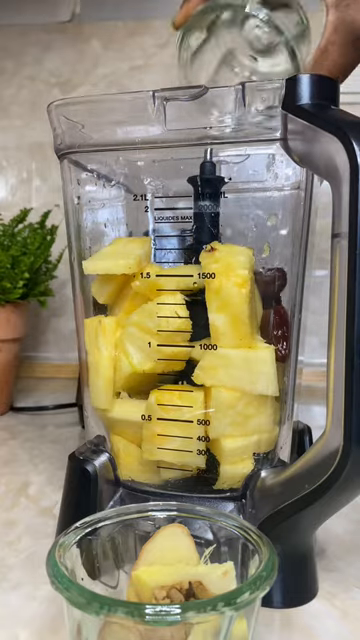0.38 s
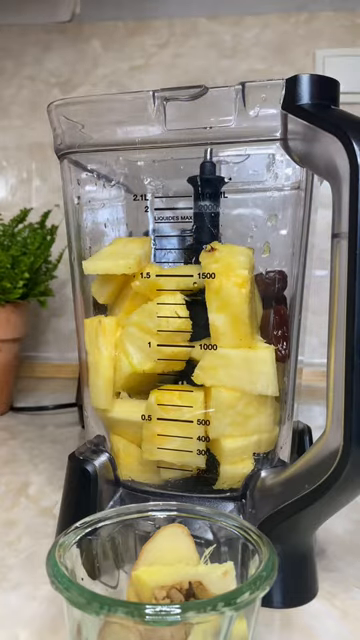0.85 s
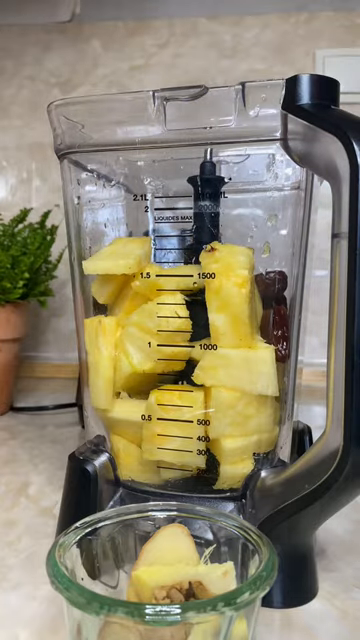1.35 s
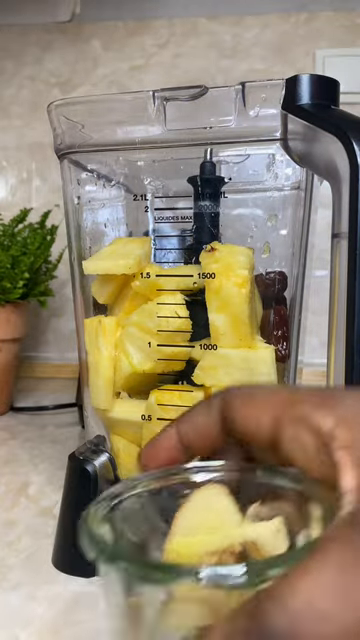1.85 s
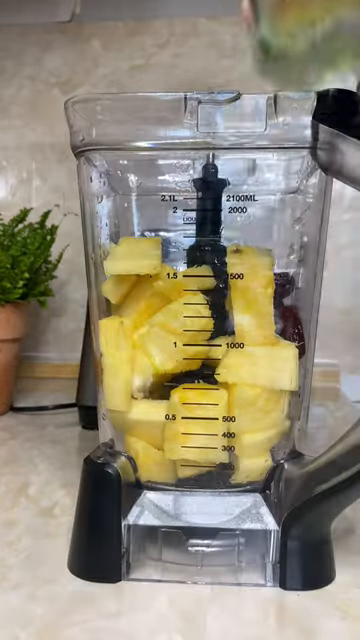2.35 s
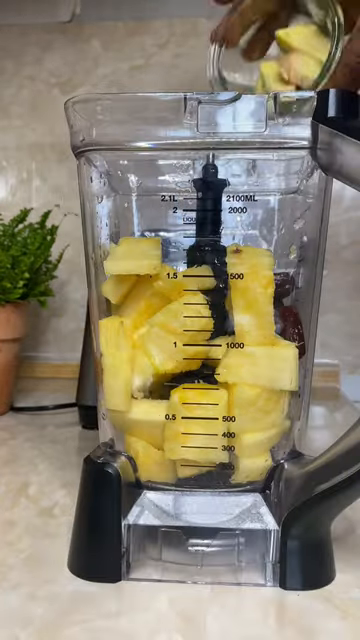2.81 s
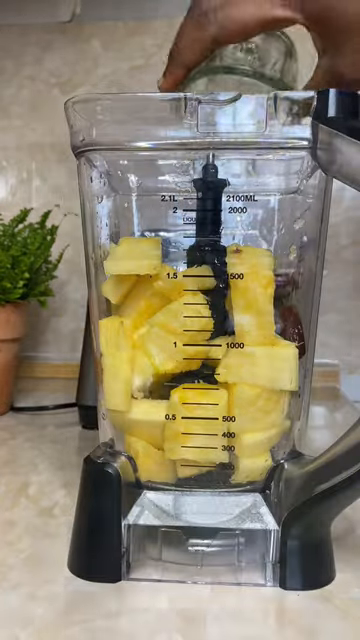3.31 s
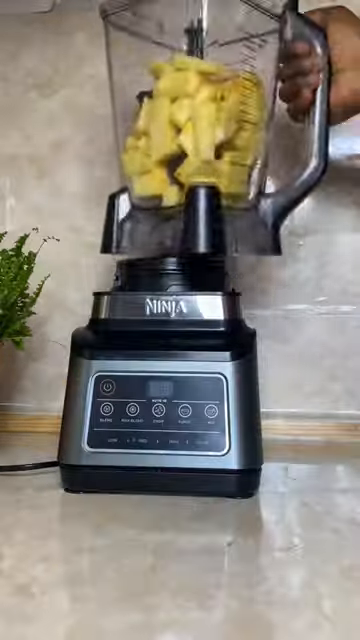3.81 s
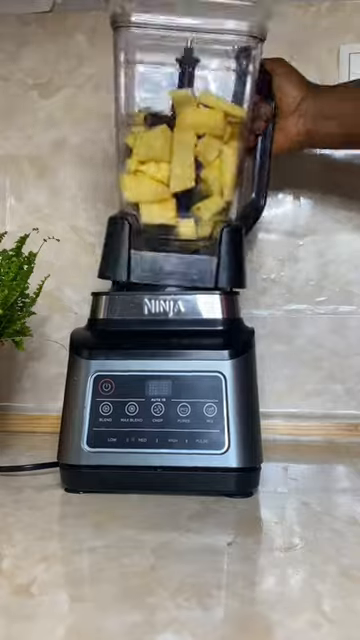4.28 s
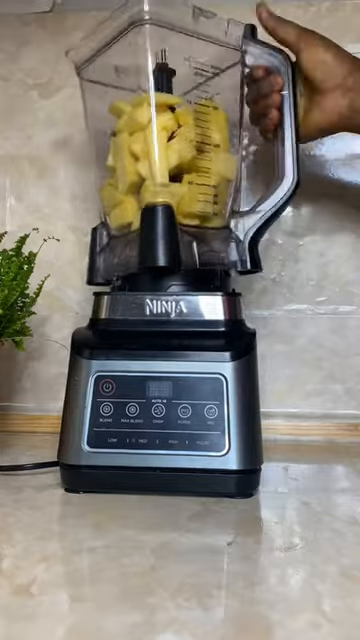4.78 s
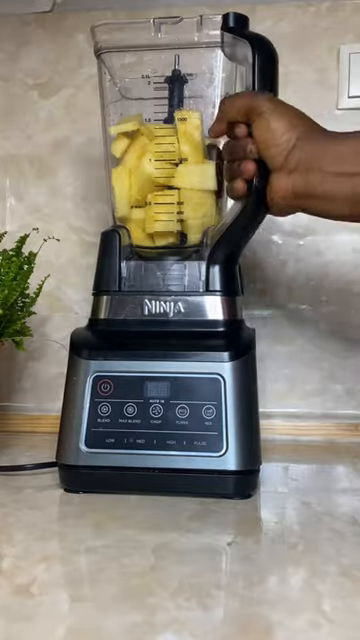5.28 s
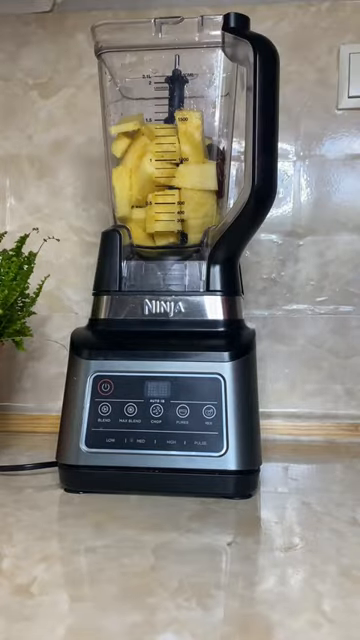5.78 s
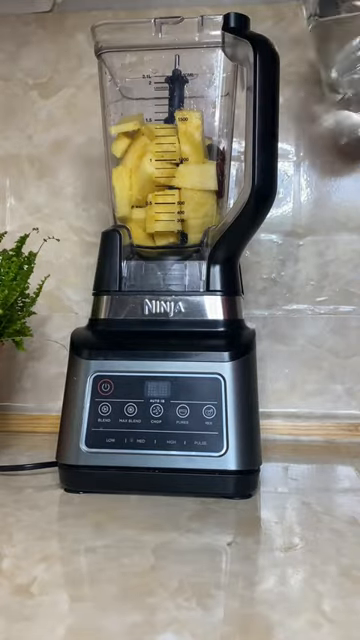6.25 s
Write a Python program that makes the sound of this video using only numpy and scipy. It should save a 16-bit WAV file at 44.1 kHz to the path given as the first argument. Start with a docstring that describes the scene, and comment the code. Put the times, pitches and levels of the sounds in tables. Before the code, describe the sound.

Close-up kitchen handling: dried fruit and root pieces tumble into a hollow plastic jar, which is then rattled and locked onto a blender base.

```python
"""Dried fruit and root chunks are tipped from glass bowls into a plastic blender jar in a tiled kitchen.
A hand lifts the second bowl from the counter; then the jar is set on its base, knocking and scraping home.
Every blow is a cluster of contacts ringing a body's modes, plus unpitched rattle; rubbing is grainy noise.
Sticky ticks, whispers, a short echo and dull air with low rumble and appliance tones surround the blows.
Two close microphone ports hear it all; the sound drops out completely for a moment midway."""
import sys
import numpy as np
from scipy import signal
from scipy.fft import rfft, irfft, next_fast_len
from scipy.io import wavfile
from scipy.ndimage import uniform_filter1d

SR = 44100
rng = np.random.default_rng(int(sys.argv[2]) if len(sys.argv) > 2 else 0)


def log_audio(samples):
    """Write samples as a 16-bit WAV file to the path given in sys.argv[1]."""
    # one column per channel
    frames = np.atleast_2d(samples).T
    # limit to full scale, then quantise
    limited = np.clip(frames, -1, 1)
    pcm = np.round(limited * 32767).astype(np.int16)
    wavfile.write(sys.argv[1], SR, pcm)


def ratio(d):
    """dB to gain"""
    e = np.asarray(d, float) / 20
    return 10 ** e


N = 281358

# Blows, levels as heard ahead of the microphone:
# full contact t/s, knock peak level/dB, thud level/dB re knock, clack level/dB re knock, contact time/s
CHUNK_DROPS = [(0.083, -44, 13.5, -1.5, 0.002), (0.097, -43.5, 16.5, -1, 0.00063),
               (0.108, -42.5, 11.5, -8, 0.00078), (0.143, -33, 4, -18, 0.003),
               (0.1505, -14, -20.5, -11, 0.0012), (0.1695, -10, -24.5, -14.5, 0.0015),
               (0.188, -16, -5.5, -15, 0.0016), (0.221, -20.5, -6, -14.5, 0.0014),
               (0.233, -28.5, -2, -4.5, 0.0013), (0.243, -36, 12.5, -11, 0.0021),
               (0.256, -29.5, -3.5, -34, 0.0014), (0.289, -39, 8.5, -4.5, 0.0016),
               (0.3, -34.5, 13.5, -13, 0.0014), (0.34, -42, 11.5, -6.5, 0.0017),
               (0.37, -35, 0.5, -15.5, 0.0013), (0.406, -42.5, 1.5, -17, 0.0012),
               (0.466, -37, -5.5, -5, 0.0011), (0.498, -50.5, 6, -8, 0.00087),
               (0.54, -59.5, 9.5, -23, 0.0015), (3.119, -29.5, -2.5, -31.5, 0.00057),
               (3.139, -43, 14.5, -8, 0.0013), (3.16, -39.5, 11, -15, 0.0015),
               (3.182, -27.5, -14, -37, 0.0016), (3.201, -27.5, -3, -37, 0.0021),
               (3.2135, -21.5, -14.5, -38, 0.0011), (3.228, -26.5, -8, -24, 0.0021),
               (3.236, -22, -1, -39, 0.0024), (3.247, -27, 3.5, -41, 0.0018),
               (3.266, -30.5, -8, -48, 0.0016), (3.314, -49, -10, -39, 0.0024),
               (3.322, -41, 3.5, -8.5, 0.0018)]  # chunks landing in the jar
BASE_SEATING = [(3.484, -24, 2, -16.5, 0.0019), (4.013, -12.5, -6, -14, 0.002),
                (4.067, -19, -5.5, -14.5, 0.0023), (4.096, -30.5, 2.5, -13.5, 0.0029),
                (4.113, -12.5, -5, -15.5, 0.0024), (4.141, -20.5, 0, -4.5, 0.0025),
                (4.168, -43, 8.5, -22.5, 0.0032), (4.241, -40, 5, -3, 0.0041),
                (4.254, -27.5, 1, -7.5, 0.0022), (4.291, -28, 2.5, -2.5, 0.003),
                (4.298, -18, -4, -6.5, 0.002), (4.308, -16.5, -3.5, -5, 0.0035),
                (4.322, -17.5, -7.5, -29, 0.002), (4.347, -31, -10, -8.5, 0.0017),
                (4.361, -35.5, 5.5, -0.5, 0.0022), (4.404, -22.5, -3, -10, 0.002),
                (4.412, -21.5, 2, -11.5, 0.0022), (4.431, -20.5, 2, -8.5, 0.0025),
                (4.469, -35, -2.5, -8, 0.0022), (4.5, -24.5, -7.5, -34, 0.002), (4.543, -46, 7, -10, 0.002),
                (4.639, -34.5, -2, -4, 0.0025), (4.666, -28.5, 0, -21.5, 0.0022),
                (4.682, -27, -1.5, -7.5, 0.003), (4.695, -19.5, -1, -9.5, 0.0024),
                (4.703, -30, 10.5, -16, 0.002), (4.723, -30.5, 6, -1.5, 0.0024),
                (4.737, -45.5, -4, -24, 0.0022), (4.78, -43, -1.5, -9.5, 0.0022),
                (4.825, -38.5, 9.5, 0.5, 0.0032), (4.857, -24, -6, -2.5, 0.0035),
                (4.863, -18, 1.5, -1, 0.0024), (4.875, -10.5, -12.5, -0.5, 0.0016),
                (4.885, -19, -5.5, -16.5, 0.0033), (4.901, -16, -6, -5, 0.0022),
                (4.926, -32.5, 1, -12.5, 0.0027), (4.951, -34.5, -0.5, -4.5, 0.0025),
                (4.999, -47.5, 6, -9.5, 0.0017), (5.041, -52, 4, -25, 0.0018),
                (5.071, -45.5, 5, -20, 0.0019), (5.12, -32, -3, -6, 0.0022), (5.132, -23, -12, -6, 0.0022),
                (5.139, -29, -9, -9.5, 0.0019), (5.225, -53, 7, 4, 0.0022), (5.264, -34.5, -4, 7, 0.0044),
                (5.276, -16.5, -5.5, -1, 0.0027), (5.29, -31.5, -3.5, -10.5, 0.0019),
                (5.395, -45, -10.5, -6, 0.0032), (5.417, -52.5, 4, -10, 0.0026)]  # the jar's foot against the base
BASE_TOUCHES = [(3.864, -53.5, -5, 5, 0.003), (3.875, -36, -4, 3, 0.003), (3.883, -21.5, -9, -6.5, 0.0012),
                (3.901, -33.5, 2.5, -10, 0.002), (3.956, -28, -5, -1.5, 0.0011)]  # the jar's foot, still hanging, brushes the base and rings freely
BOWL_HANDLING = [(0.922, -51.5, -20, -18, 0.0017), (0.94, -57, -1, 0, 0.0025),
                 (1.302, -49, -18.5, -40, 0.0061), (1.683, -48.5, -8, -38, 0.0065),
                 (1.705, -44.5, -19, -38, 0.0044), (1.752, -43.5, -25.5, -46, 0.0063),
                 (1.875, -52.5, -23.5, -2.5, 0.0026), (1.926, -57.5, -16.5, -13, 0.0023),
                 (1.991, -48.5, -9, 12.5, 0.002), (1.997, -48.5, -6.5, 6.5, 0.002),
                 (2.023, -75.5, 17, -16, 0.0014), (2.041, -63, -3.5, -10, 0.0017),
                 (2.116, -67.5, -16, 19, 0.0025), (2.196, -57.5, -1, -14, 0.0016),
                 (2.313, -73.5, 9.5, -12, 0.00227), (2.357, -65.5, 14.5, -20, .003),
                 (2.386, -49.5, 1, 5, 0.00098), (2.406, -52.5, -6, -7, 0.0024),
                 (2.455, -65, -10, -24, 0.0022), (2.497, -57, 0, 0, 0.0025), (2.515, -68.5, 6, 12, 0.0022),
                 (3.364, -40, -2.5, 12, 0.0028), (3.385, -49, -10.5, 5, 0.0025),
                 (3.399, -55, 18, -16, 0.0026), (3.422, -52, 8, -11, 0.0022), (3.437, -45, 2.5, 21, 0.0013),
                 (3.445, -52, 0.5, 14.5, 0.0024), (3.46, -59, 4.5, -4, 0.0014),
                 (3.792, -76, -19, 17, 0.0023)]  # the bowl on the counter, in the hand and against the rim
# Edges between the thud, knock, clack and crack bands: f/Hz
BAND_EDGES_HZ = (42, 300, 1000, 4500, 16000)
# Modes of each body, before a blow detunes and rebalances them: f/Hz, level/dB within its band, t60/s
JAR_MODES = [(66.7, -4, 0.55), (74, -4.5, .12), (90, 5.5, 0.14), (124, -2, 0.19), (213, 1, 0.12),
             (397, -19, 0.25), (474.4, -4, 0.21), (525, -1, .035), (567, -1, 0.17), (652, -5.5, 0.014),
             (770, -14, 0.054), (900, -10.5, 0.045), (1002, -16, 0.15), (1230, -7.5, 0.064),
             (1430, -9, 0.054), (1696, -8.5, 0.04), (1860, -16, 0.028), (2100, -14, 0.05),
             (3020, -16, 0.014)]
BASE_MODES = [(77, -9, 0.038), (114.7, -7.5, 0.051), (128, -2, 0.14), (191.4, -1, 0.051), (250, 0, 0.05),
              (306.2, -9.5, 0.0512), (388.6, -11, 0.087), (472, -11, 0.098), (658, 7, 0.036),
              (796, -3, 0.04), (1045.7, 5, 0.05), (1303, 1, 0.09), (1541, 1.5, 0.034), (1674, -1.5, 0.023),
              (1915, -11.5, 0.025), (2110, -7.5, 0.035), (2210, -3, 0.04), (2462, 0, 0.063),
              (2700, -6, 0.034), (2836, -7, 0.04), (3260, -11.5, 0.045), (3344, -6.5, 0.035),
              (3490, -10, 0.012), (3853, -3.5, .035)]
FOOT_MODES = [(99.5, -1, .08), (138.6, -3.5, 0.044), (250, -2, 0.076), (398, -18.5, 0.092),
              (498, -11, 0.059), (700, -1, 0.0248), (810, 6, .025), (972, -7.5, 0.041), (1285, -4, 0.043),
              (1543, 2.5, 0.052), (1638, 0, .045), (1829, -6.5, 0.043), (2430, -16, 0.036),
              (2923, -31, .03), (3470, -17, 0.012)]  # while the jar hangs free
BOWL_MODES = [(79.2, -1, 0.2), (145.4, -7.5, 0.099), (294, -11, 0.15), (480.4, 12.5, 0.11), (530, 4, 0.059),
              (950, -31.5, 0.097), (1137, 5.5, 0.051), (1218, 8.5, 0.074), (1320, -6, .06),
              (1632, 5, 0.046), (1970, -6.5, 0.014), (2062, 3, 0.041), (2390, -5, 0.021), (2845, -6, 0.036),
              (3880, -14.5, .04)]
# Unpitched part of a blow, a row for each band: share/0-1, t60/s, dulls above f/Hz
JAR_RATTLE = [(0.2, 0.44, 43), (0.06, 0.25, 454), (0.29, 0.14, 350), (1, 0.035, 11000)]
BASE_RATTLE = [(0.42, 0.1, 350), (0.17, 0.12, 810), (0.33, 0.059, 680), (1, 0.04, 36000)]
TOUCH_RATTLE = [(.25, .06, 130), (.2, .05, 500), (.3, .06, 1200), (1, .04, 9000)]
BOWL_RATTLE = [(0.27, 0.065, 77), (0.052, 0.57, 130), (0.28, 0.056, 1700), (1, 0.041, 6600)]
# Top crack of a blow; a longer contact slides and fizzes:
# level/dB re knock, share of the clack level it follows, rise/dB for each doubling of contact time
JAR_CRACK = (-15.5, 0.98, 1.9)
BASE_CRACK = (-11.5, 1, 6.2)
TOUCH_CRACK = (-19.5, 0.8, 1.5)
BOWL_CRACK = (-8.5, 0.68, 1.5)
# Small pitched ticks: start t/s, ring peak level/dB, centre f/Hz, ring t60/s, snap level/dB re ring
TICKS = [(0.289, -53, 3080, 0.059, -6), (0.467, -53, 3180, 0.045, 9), (3.141, -49.5, 1084, 0.052, -27),
         (3.156, -61, 2006, 0.11, -23), (3.183, -49, 1035, .05, -25), (3.234, -59, 1380, 0.11, -25),
         (0.553, -50.5, 2070, 0.064, 12.5), (0.5773, -47.5, 2980, 0.03, 11),
         (0.618, -51.5, 1430, 0.052, -14.5), (0.8846, -62, 1980, 0.092, -5), (5.473, -55, 2400, 0.03, 14.5),
         (5.628, -56, 1725, 0.063, 0.5), (5.7887, -76, 3110, 0.15, -8)]
# Strokes of skin, glass and plastic rubbing: middle t/s, length/s, level/dB, treble level/dB re mid
STROKES = [(0.0, 0.089, -72.5, 7), (0.212, 0.16, -49.5, -15), (0.551, 0.18, -66, 2.5),
           (0.77, 0.14, -85.5, 8), (0.926, 0.1, -72.5, -14), (1.078, 0.15, -80, 5.5),
           (1.436, 0.45, -84.5, 7), (1.565, 0.093, -81.5, 14.5), (1.726, 0.17, -77, -25),
           (1.89, 0.15, -69.5, -8), (2.006, 0.068, -57.5, -8), (2.125, 0.15, -68.5, -9),
           (2.312, 0.036, -86, 21.5), (2.223, 0.11, -85, 10), (2.392, .03, -64, -17),
           (2.424, 0.031, -67, -19), (2.513, 0.082, -67, -30), (2.852, 0.61, -89.5, -8.5),
           (3.204, 0.11, -66.5, -3), (3.407, 0.12, -49, -8.5), (3.615, 0.13, -60, -6.5),
           (3.93, 0.03, -58.5, -31.5), (3.985, .05, -60, -23), (4.037, 0.092, -47.5, -20),
           (4.008, 0.014, -38, -13), (4.134, 0.061, -40.5, -6), (4.315, 0.053, -36, -1.5),
           (4.425, 0.058, -36.5, -12), (4.496, 0.032, -48.5, -3.5), (4.681, 0.1, -46.5, -14.5),
           (4.896, 0.055, -30, -7.5), (5.065, 0.17, -56, -4.5), (5.269, 0.029, -31.5, 4.5),
           (5.302, 0.043, -42, -6), (5.396, 0.045, -64, 3), (5.485, 0.18, -75.5, 2.5),
           (5.743, 0.33, -89.5, 3.5)]
# Spectra of the rub: f/Hz, relative level/dB per Hz
RUB_MID = [(410, -34), (700, -4.5), (884, -6.5), (1260, -5.5), (1420, -13), (2200, -10.5), (4500, -28),
           (5850, -57), (9900, -120)]
RUB_TREBLE = [(2650, -17.5), (4500, -11.5), (6460, -11), (7180, -13.5), (7370, -16), (8070, -3.5),
              (11100, -9), (16000, -13)]
# Skin or plastic sliding keeps one resonance whispering:
# start t/s, length/s, rms level/dB before the swell, f/Hz, width of each of two equal poles/Hz
WHISPERS = [(0.581, .11, -63, 2700, 250), (0.618, 0.12, -61, 1326, 200), (0.887, 0.19, -73.5, 2100, 700),
            (1.422, 0.25, -76.5, 2200, 890), (1.542, 0.13, -68, 2420, 700), (1.543, .09, -71, 2000, 218),
            (2.105, 0.062, -70, 1340, 400), (3.944, 0.058, -47, 1606, 300), (4.624, .03, -64, 1700, 250),
            (1.581, 0.15, -74, 3040, 200), (4.522, 0.054, -55, 1370, 200), (5.252, .045, -37.5, 2520, 200),
            (5.256, .04, -43, 3324, 200), (5.385, 0.049, -60, 2600, 296)]
# Decay of the kitchen's echo: f/Hz, t60/s
KITCHEN_DECAY = [(80, 0.3), (500, 0.17), (2000, 0.45), (6000, 0.38), (14000, 0.66)]
# Spectra of the air, first and then after its colour changes: f/Hz, relative level/dB per Hz
AIR_EARLY = [(15, -40), (25, -6), (53, -4.5), (190, -9.5), (384, -15.5), (427, -7.5), (695, -27.5),
             (818, -34.5), (1840, -34.5), (5730, -42), (7920, -58), (11600, -38.5), (16000, -56)]
AIR_LATE = [(12, -52.5), (20, -22), (55, -18.5), (134, -3), (262, -12.5), (422, -10.5), (513, -14.5),
            (624, -13), (1220, -31), (1330, -27), (1480, -28.5), (5850, -41), (7310, -39), (16000, -49)]
# Level of the air and the low rumble of handling: t/s, level/dB
AIR_LEVEL = [(0, -66), (.7, -63.5), (1.2, -66.5), (1.45, -69), (1.9, -63), (2.3, -65.5), (2.45, -60.5),
             (2.7, -69.5), (3.1, -66.5), (3.8, -65.5), (5.3, -55), (5.55, -73.5), (5.9, -72.5), (6.1, -74),
             (6.38, -75.5)]
# Crossfade from the early to the late air colour: start t/s, end t/s
AIR_FADE = (3.4, 3.6)
# Appliance tones: f/Hz, sine peak level/dB re rms of the air, before wavering
HUM = [(122, -19), (183, -11), (420, -8)]
# Microphone colour: f/Hz, level/dB
MIC = [(20, -6.5), (45, -0.5), (80, 3), (4000, 2), (7300, 3.5), (10000, -3), (12500, -4), (15700, -11),
       (16100, -66)]
# The port pair: f/Hz, likeness/0-1, left lead beyond the delay/rad, left minus right level/dB
PORTS = [(40, .96, -.1, -1.5), (135, .72, -.15, -3), (240, .75, .4, -1), (565, .75, .6, 1.5),
         (1000, .65, 1.8, 6), (1300, .5, 1.0, 5), (1700, .5, -1.2, 3), (2600, .4, .3, 0),
         (4100, .5, 1.6, -1), (5000, .55, .7, -.5), (7800, .85, .3, 0), (11500, .85, -.6, 0),
         (15700, .75, .3, .5)]
# Complete dropout: silent from t/s, silent to t/s
DROPOUT = (2.331, 2.343)


def evened(x):
    """Scales to rms 1."""
    return x / np.sqrt(np.mean(x ** 2) + 1e-20)


def peaked(x):
    """Scales each row to peak 1."""
    return x / (abs(x).max(-1, keepdims=True) + 1e-20)


def read(points, hz, axis=1):
    """Reads one column of a spectrum table on a log-frequency axis."""
    table = np.transpose(points)
    return np.interp(np.log(hz + 1), np.log(table[0] + 1), table[axis])


def add(mix, s, sound):
    """Mixes a two-row sound in at s seconds."""
    part = mix[:, round(s * SR):][:, :sound.shape[1]]
    part += sound[:, :part.shape[1]]


def noise(spectrum, patchy_db, size):
    """Makes two unrelated noises with drifting spectral patches."""
    frames, hz = 4 * N // size + 5, np.fft.rfftfreq(size, 1 / SR)
    a, b, c, d, patches = rng.standard_normal((frames, len(hz), 5)).T
    patches = uniform_filter1d(patches, size=8, axis=0)
    patches = evened(uniform_filter1d(patches, size=10, axis=1))
    level_db = read(spectrum, hz)[:, None] + patchy_db * patches
    z = np.array([a + 1j * b, c + 1j * d]) * ratio(level_db)
    return evened(signal.istft(z, nperseg=size, noverlap=3 * size // 4)[1][:, :N])


def blows(rows, modes, rattle, crack, spread_db, octave_db, strike):
    """A cluster of contacts rings the modes and rattles; the balance of the modes varies with each blow."""
    size = 6000  # samples in one blow
    plain_contact = 0.002  # s, contact time at which the crack has its plain level
    thud_lag = 0.00035  # s, the heavy body answers just after the shell
    t, out = np.arange(size) / SR, np.zeros((2, N))
    hz, db, t60 = np.array(modes)[:, :, None].transpose(1, 0, 2)
    closing = np.cos(np.pi / 2 * t / t[-1]) ** 0.5  # the last of each ring dies away smoothly
    db = db + octave_db * np.log2(np.maximum(hz / 1850, 1))  # tilts the modes above 1850 Hz
    fades = ratio(db - 60 * t / t60) * closing
    fickle = np.minimum(hz[:, 0] / 1200, 1)  # modes below 1200 Hz care less where the blow lands
    edges = list(zip(BAND_EDGES_HZ, BAND_EDGES_HZ[1:]))
    bands = [signal.butter(2, edge, "bandpass", fs=SR, output="sos") for edge in edges]
    soft = [signal.butter(4, 1.2 * hi, fs=SR, output="sos") for lo, hi in edges]
    for s, knock_db, weight_db, hard_db, contact in rows:
        contact = np.clip(contact, 1 / 2000, 1 / 120)
        crack_db = crack[0] + crack[1] * hard_db + crack[2] * np.log2(contact / plain_contact)
        levels_db = knock_db + np.array([weight_db, 0, hard_db, crack_db])

        # grip and load shift the modes a little from blow to blow
        detune = 1 + 0.03 * fickle[:, None] ** 2 * rng.standard_normal(hz.shape)
        rings = fades * np.sin(2 * np.pi * hz * detune * t)
        spot = ratio(spread_db * fickle * rng.standard_normal((2, len(hz))))
        # in the first row the low modes mostly start the same way
        flip_odds = [fickle ** 2 / 2, 0 * fickle + 0.5]
        spot *= np.where(rng.random(spot.shape) < flip_odds, -1, 1)

        # each blow swells in over four contact times and falls faster
        u = t / contact
        swell_in = np.exp(-abs(u - 4) * np.where(u < 4, 1, 1.5))
        grit = swell_in[:2000] * rng.standard_normal((2, 2000)) ** 3  # uneven micro-contacts
        grit = grit / np.linalg.norm(grit, axis=1, keepdims=True)
        # one clean main contact, lost in a slow swell
        grit[:, round(4 * contact * SR)] += strike * (plain_contact / contact) ** 2

        hiss = rng.standard_normal((len(bands), 2, size))
        for k, (lo, hi) in enumerate(edges):
            inside = ((hz >= lo) & (hz < hi))[:, 0]
            share, dies, dull_hz = rattle[k]
            ring = signal.fftconvolve(spot[:, inside] @ rings[inside], grit, axes=1)[:, :size] * closing
            ring = peaked(signal.sosfilt(soft[k], ring))  # low modes feel a soft push, not the grit
            rattle_swell = signal.lfilter([1], [1, -ratio(-60 / (dies * SR))], swell_in)
            buzz = signal.sosfilt(bands[k], hiss[k] * rattle_swell * closing)
            buzz = peaked(signal.sosfilt(bands[k], buzz))
            dull = np.exp(-2 * np.pi * dull_hz / SR)
            buzz = peaked(signal.lfilter([1], [1, -dull], buzz))
            body = peaked(max(1 - share, 0) * ring + share * buzz)
            add(out, s - 4 * contact + thud_lag * (k == 0), ratio(levels_db[k]) * body)
    return out


def chunk_drops():
    """Dried chunks strike the plastic jar and ring its shell."""
    return blows(CHUNK_DROPS, JAR_MODES, JAR_RATTLE, JAR_CRACK, spread_db=0.0, octave_db=1.5, strike=2.2)


def bowl_handling():
    """Small contacts ring the glass bowl's modes."""
    return blows(BOWL_HANDLING, BOWL_MODES, BOWL_RATTLE, BOWL_CRACK, spread_db=4.0, octave_db=1.0, strike=1.6)


def base_touches():
    """The jar's foot, still hanging, brushes the base and rings freely."""
    return blows(BASE_TOUCHES, FOOT_MODES, TOUCH_RATTLE, TOUCH_CRACK, spread_db=2.2, octave_db=0, strike=1.5)


def base_seating():
    """The jar's foot knocks on the base and rings the base modes."""
    return blows(BASE_SEATING, BASE_MODES, BASE_RATTLE, BASE_CRACK, spread_db=7.0, octave_db=-2.5, strike=3.2)


def ticks():
    """Tiny sticky clicks: a noise snap with a blurred cluster of pitches."""
    spread, snap_t60, attack = 0.0423, 0.0196, 0.00083  # share of the pitch, s, s
    t, out = np.arange(6000) / SR, np.zeros((2, N))
    for s, db, hz, t60, snap_db in TICKS:
        detune, start = 1 + spread * rng.standard_normal((8, 2, 1)), rng.random((8, 2, 1))
        turns = hz * detune * t
        ring = np.sin(2 * np.pi * (turns + start)).sum(0) * ratio(-60 * t / t60)
        ring = peaked(ring * (1 - np.exp(-t / attack)))
        snap = np.diff(rng.standard_normal((2, len(t))), prepend=0)
        snap = peaked(snap * ratio(-60 * t / snap_t60))
        add(out, s, ratio(db) * (ring + ratio(snap_db) * snap))
    return out


def rubbing():
    """Grainy friction: noise that swells with each stroke and with soft slips."""
    slips = ratio(3 * np.minimum(rng.exponential(1, N), 3)) * (rng.random(N) < 90 / SR)  # about 90 a second
    grain = evened(5 + signal.oaconvolve(slips, np.hanning(600))[:N])
    t = np.arange(0, N, 64) / SR
    middle, length, db, bright_db = np.array(STROKES).T[:, :, None]
    u = 2 * (t - middle) / length
    # dB half a length before and after the middle of a stroke
    start_db, end_db = -14.5, -6
    swell = ratio(db + np.where(u < 0, start_db, end_db) * u ** 2)
    full_t = np.arange(N) / SR
    mid = np.interp(full_t, t, swell.sum(0)) * noise(RUB_MID, patchy_db=3.0, size=256)
    treble = np.interp(full_t, t, (swell * ratio(bright_db)).sum(0))
    treble = treble * noise(RUB_TREBLE, patchy_db=2.0, size=256)
    return grain * (mid + treble)


def whispers():
    """Noise through one narrow resonance, quick to swell and slow to fade."""
    out = np.zeros((2, N))
    t = np.arange(8000) / SR  # longer whispers are cut here
    for s, length, db, hz, width in WHISPERS:
        r = np.exp(-np.pi * width / SR)
        slow = rng.standard_normal((2, len(t))) + 1j * rng.standard_normal((2, len(t)))
        slow = signal.lfilter([1], [1, -2 * r, r * r], slow)
        tone = evened((slow * np.exp(2j * np.pi * hz * t)).real)
        swell = np.sin(np.pi * np.minimum(t / length, 1) ** 0.5) ** 2
        add(out, s, ratio(db) * swell * tone)
    return out


def kitchen(x):
    """Echo of sparse random-sign taps, one in every 20 samples, each band dying at its own speed."""
    taps = np.zeros((2, SR // 2))
    at = np.arange(200, SR // 2 - 20, 20)
    at = at + rng.integers(0, 20, (2, len(at)))
    np.put_along_axis(taps, at, rng.choice([-1., 1.], at.shape), 1)
    hz, t, z = signal.stft(taps, SR, nperseg=512)
    tail = signal.istft(z * ratio(-60 * t / read(KITCHEN_DECAY, hz)[:, None]), SR, nperseg=512)[1]
    return signal.fftconvolve(x, tail / np.linalg.norm(tail[0]), axes=1)[:, :N]


def room_tone():
    """Dull air and low handling rumble as shaped noise, with faint wavering appliance tones."""
    t = np.arange(N) / SR
    waver = evened(uniform_filter1d(rng.standard_normal((len(HUM), N)), size=8000, axis=1))
    hum = sum(ratio(db + 1.3 * w) * np.sin(2 * np.pi * hz * t) for (hz, db), w in zip(HUM, waver))
    turn = np.interp(t, AIR_FADE, (0, np.pi / 2))
    air = np.cos(turn) * noise(AIR_EARLY, patchy_db=3.0, size=2048)
    air = air + np.sin(turn) * noise(AIR_LATE, patchy_db=1.8, size=2048)
    return ratio(np.interp(t, *np.transpose(AIR_LEVEL))) * (air + hum)


def scene():
    """Two sound paths from every source, later shared out between the ports."""
    near = chunk_drops() + bowl_handling() + base_touches() + base_seating()
    # the blows carry little below 51 Hz
    near = signal.sosfilt(signal.butter(2, 51, "highpass", fs=SR, output="sos"), near)
    near = near + ticks() + whispers()
    return near + ratio(-16) * kitchen(near) + rubbing() + room_tone()


def low_pass(x):
    """Removes everything above the highest recorded frequency."""
    return signal.sosfilt(signal.butter(12, 16400, fs=SR, output="sos"), x)


def record(dry):
    """Microphone colour; the ports share part of the sound, shifted in phase and balance; the dropout."""
    size = next_fast_len(N + 4096)
    hz, fields = np.fft.rfftfreq(size, 1 / SR), rfft(dry, size)
    a, b = fields * ratio(read(MIC, hz))
    same = np.clip(read(PORTS, hz), 0, 1)
    port_delay = 0.00019  # s, the left port hears first
    lead = 2 * np.pi * hz * port_delay + read(PORTS, hz, axis=2)
    tilt = np.exp(0.5j * lead) * ratio(read(PORTS, hz, axis=3) / 2)  # half on each side
    left = a * tilt
    right = (same * a + np.sqrt(1 - same ** 2) * b) / tilt
    pair = irfft(np.array([left, right]), size)[:, :N]
    t = np.arange(N) / SR
    # 2 ms ramps on both sides of the silence
    gate = np.clip(np.maximum(DROPOUT[0] - t, t - DROPOUT[1]) / 0.002, 0, 1)
    return low_pass(pair * gate)


dry = scene()
out = record(dry)
log_audio(out)
```